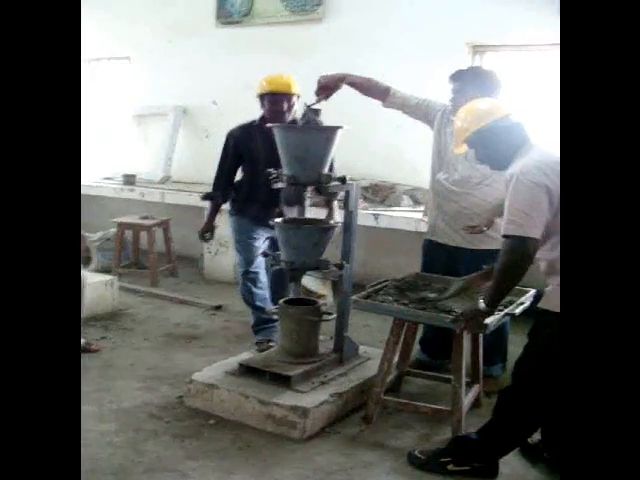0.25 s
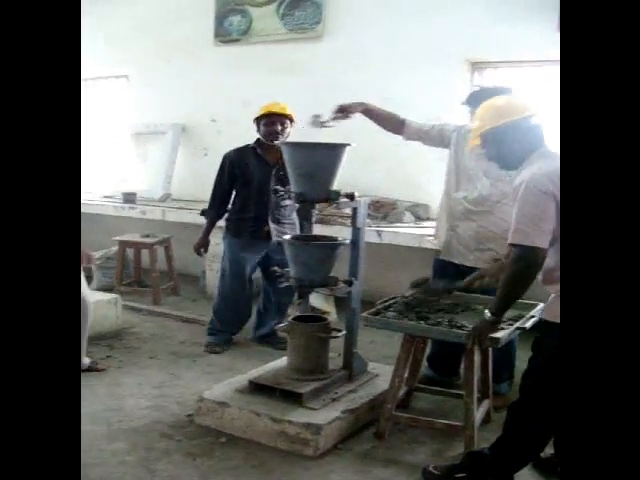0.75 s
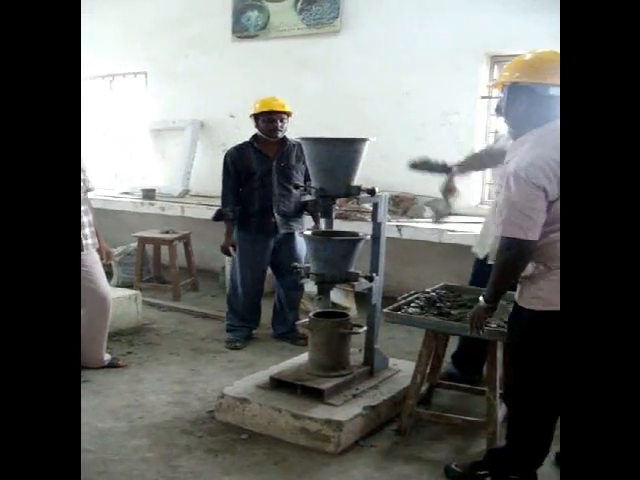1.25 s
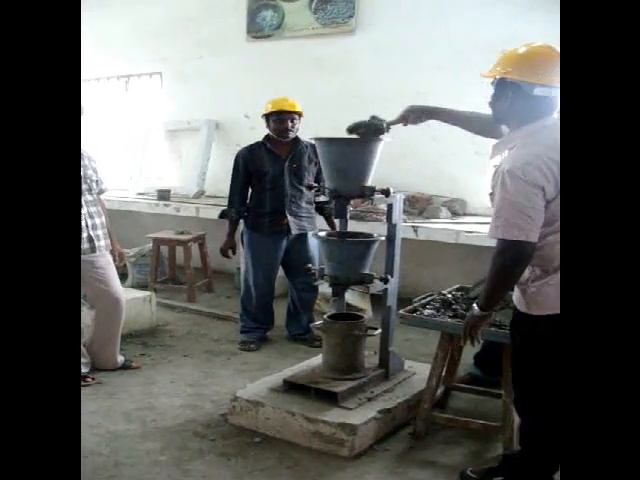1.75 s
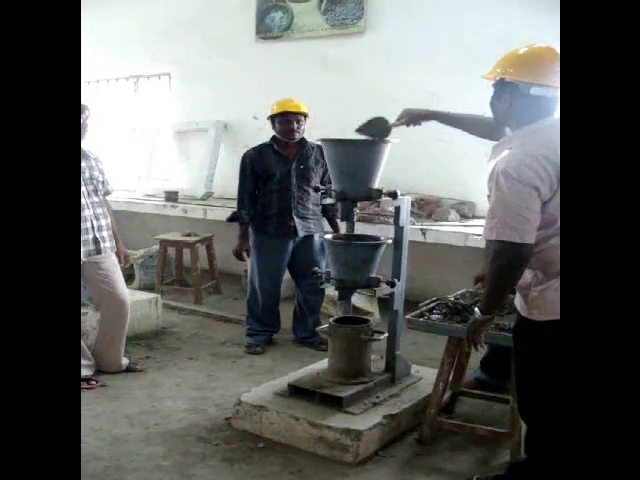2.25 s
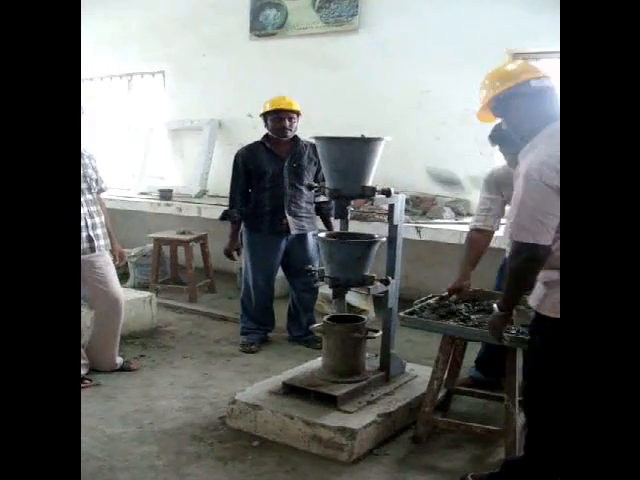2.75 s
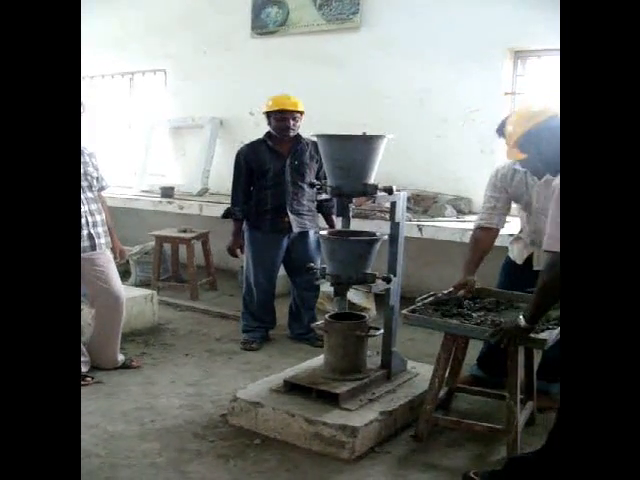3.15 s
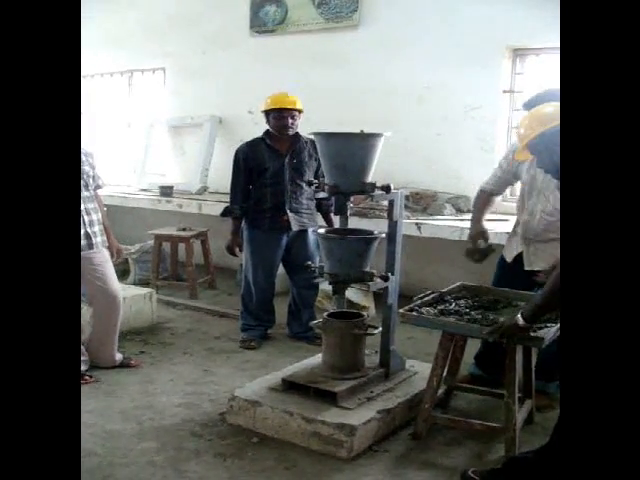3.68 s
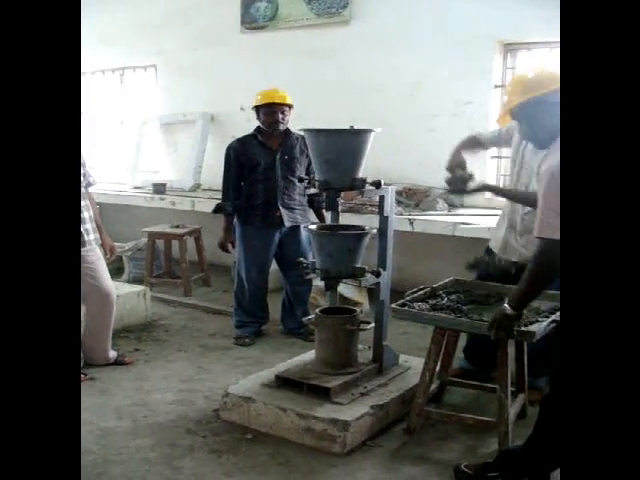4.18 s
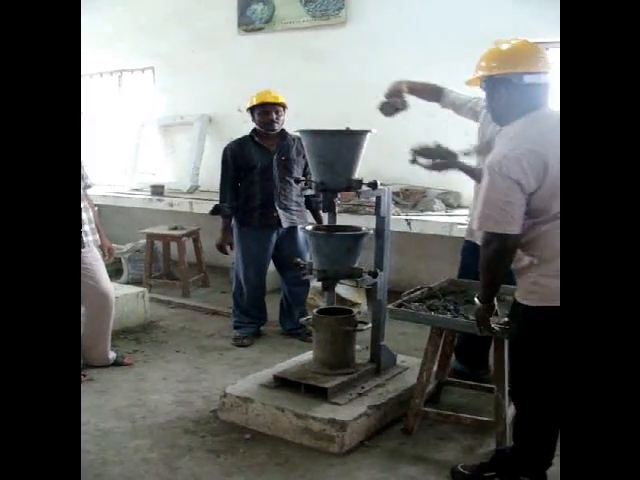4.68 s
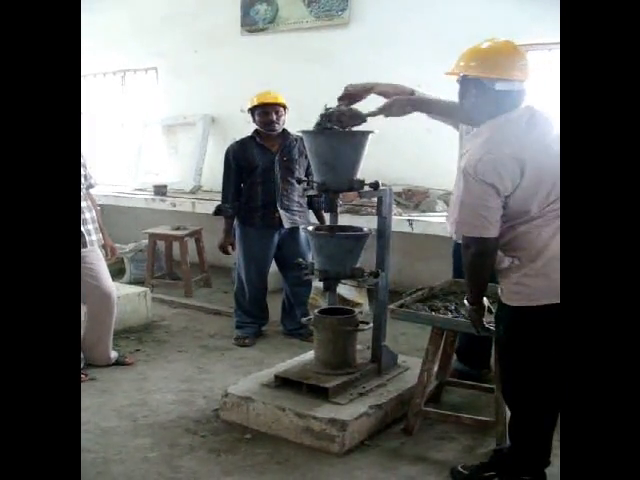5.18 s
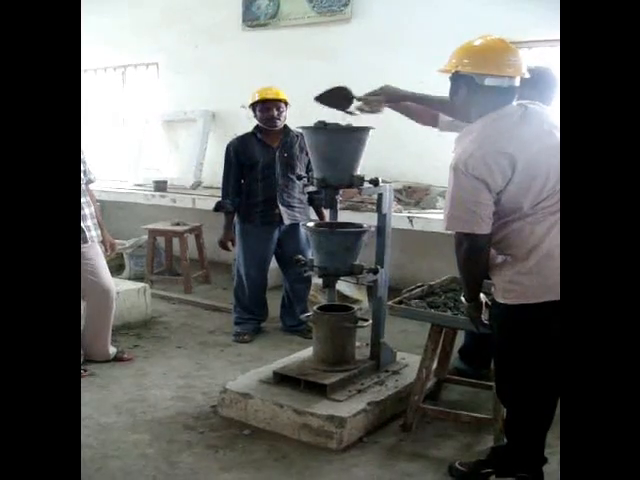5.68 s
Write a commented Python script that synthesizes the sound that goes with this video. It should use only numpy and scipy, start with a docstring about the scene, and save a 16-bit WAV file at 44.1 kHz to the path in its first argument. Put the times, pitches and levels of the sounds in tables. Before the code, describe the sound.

A steel scoop crunches and rasps through wet, gravelly concrete on a metal tray for the first half second. It pings thinly at about 0.5 seconds, then grit trickles, clods land and stones click until about 1.5. From 1.9 to 3.6 seconds the blade sticks and slips through the mix in short, gritty, slightly screeching pushes, with sharp stone clicks and a dull tray clatter at 3.2. After a brief lull, a whole load slaps down at 4.4 and loose gravel spatters. A trowel clinks brightly at 5 seconds, then knocks the sheet-metal hopper at 5.3, leaving it ringing while grit slides off, with a last small crunch at 5.8. Everything echoes in a bare lab over a soft rush of air, strongest at the start. The small mono microphone overloads with a low thump on the slap and the hopper knock.

```python
"""A bare, echoing lab, where fresh concrete is scooped from a steel tray into a sheet-metal hopper.
The blade sticks and slips through the gravel, crunching and rasping; stones click, wet clods land
and a whole load slaps down. Tray, scoop, trowel and hopper each crack and ring when struck.
Air rushes softly underneath, and a small mono microphone overloads slightly on the loudest moments."""
import sys
import numpy as np
from scipy import signal
from scipy.fft import rfft, irfft, next_fast_len
from scipy.io import wavfile
from scipy.ndimage import map_coordinates

SR = 44100
rng = np.random.default_rng(int(sys.argv[2]) if len(sys.argv) > 2 else 0)


def output_pcm(signal):
    """Save a mono or channel-first signal as 16-bit PCM at the path in sys.argv[1].

    Samples are clipped to [-1, 1] before scaling.
    """
    pcm = np.clip(np.atleast_2d(signal).T, -1, 1) * 32767
    wavfile.write(sys.argv[1], SR, np.round(pcm).astype(np.int16))


N = 261336


def amp(db):
    """Decibels to gain."""
    return 10 ** (np.asarray(db) / 20)


def unit(x):
    """x scaled to rms 1."""
    return x / np.sqrt(np.mean(x ** 2) + 1e-20)


def along(points, hz):
    """(Hz, value) points read on a log axis."""
    freqs, values = np.transpose(points)
    return np.interp(np.log(hz + 1), np.log(freqs), values)


def coloured(x, gain_db):
    """x through a minimum-phase EQ whose gain in dB is a function of frequency."""
    size = 2 * next_fast_len(len(x) // 2 + 4096)
    cepstrum = irfft(np.log(amp(gain_db(np.fft.rfftfreq(size, 1 / SR))) + 1e-6), size)
    cepstrum[1:size // 2] *= 2
    cepstrum[size // 2 + 1:] = 0
    return irfft(rfft(x, size) * np.exp(rfft(cepstrum)), size)[:len(x)]


def shaped(x, eq):
    """x through an EQ curve, at rms 1."""
    return unit(coloured(x, lambda hz: along(eq, hz)))


def wobble(rate):
    """A smooth random curve, rate knots a second."""
    return map_coordinates(rng.standard_normal(int(N * rate / SR) + 4), [np.arange(N) * rate / SR])


def add(track, start, sound):
    """Mix a sound into the track, start seconds in."""
    part = track[max(round(start * SR), 0):][:len(sound)]
    part += sound[:len(part)]


def grains(per_s, spread_db):
    """Random tiny impacts of very unequal size."""
    size = amp(spread_db * np.minimum(rng.exponential(size=N), 4))
    return unit((rng.random(N) < per_s / SR) * size * rng.standard_normal(N))


def stroke(start, length, attack_s, release_t60, sag_db_per_s=10):
    """Envelope of one movement: it rises, sags as it loses speed, then dies away."""
    t = np.maximum(np.arange(N) / SR - start, 0)
    release_db = 60 * np.maximum(t - length, 0) / release_t60
    return np.minimum(t / attack_s, 1) * amp(-sag_db_per_s * t - release_db)


# The hall's reverb. Each row: frequency in Hz, t60 in seconds.
HALL_DECAY = [(100, 0.37), (400, 2.43), (1000, 1.8), (2500, 1.46), (5000, 1.12), (9000, 0.93),
              (16000, 1.34)]
def hall_tail(early_share):
    """One echo of the plastered hall, energy 1: near surfaces answer first, the mids ring longest."""
    hz, t, noise = signal.stft(rng.standard_normal(SR), SR, nperseg=256)
    energy = amp(-120 * t / along(HALL_DECAY, hz)[:, None]) + early_share * np.exp(-t / 0.022)
    tail = signal.istft(noise * np.sqrt(energy), SR, nperseg=256)[1][:SR]
    return tail / np.linalg.norm(tail)


def room(x, wet_db, pieces=24):
    """x with its echo, which changes as the tools and people move."""
    out = x.copy()
    for start in np.arange(pieces) * (N // pieces):
        piece = x[start:start + N // pieces]
        if np.abs(piece).max() > 1e-4:
            add(out, start / SR, amp(wet_db) * signal.fftconvolve(piece, hall_tail(early_share=1.0)))
    return out


# Fader ride of the air. Each row: time in seconds, level in dB.
AIR_FADER = [(0, -33.5), (1.8, -39.5), (4, -43), (5.9, -44.5)]
# Tone of the air. Each row: frequency in Hz, relative level in dB.
AIR_EQ = [(18, -26), (30, -2), (59, -13.5), (228, -2), (288, -2.5), (374, -1.5), (511, -5.5), (953, -5.5),
          (1110, -7.5), (1690, -5.5), (15000, -34)]
def room_tone():
    """The soft, wavering rush of air in the hall."""
    level_db = np.interp(np.arange(N) / SR, *np.transpose(AIR_FADER))
    return amp(level_db + wobble(3.86)) * shaped(rng.standard_normal(N), AIR_EQ)


# Microphone overload thumps. Each row: start in seconds, level in dB.
OVERLOADS = [(4.398, -23), (5.34, -21.5)]
# Their low end. Each row: frequency in Hz, relative level in dB.
OVERLOAD_EQ = [(15, 7), (30, 1), (60, -12), (170, -14), (400, -38)]
def overload_thumps():
    """A short, low thump of the microphone overloading on the two loudest blows."""
    track, t = np.zeros(N), np.arange(SR // 4) / SR
    envelope = amp(-60 * t / 0.19) * (1 - np.exp(-t / 0.0023))
    for start, db in OVERLOADS:
        add(track, start, amp(db) * shaped(rng.standard_normal(len(t)), OVERLOAD_EQ) * envelope)
    return track


# Base tone of all grit and impacts. Each row: frequency in Hz, relative level in dB.
GRIT_EQ = [(60, -13), (200, -27), (500, -4), (700, 2.5), (1500, -0.5), (3300, 2), (6000, 0.5), (9000, -5.5),
           (16000, -15.5)]
def impact(centre_hz, tilt_db, t60, wet_db):
    """A gritty contact and its echo, rolled off by tilt_db per octave either side of centre_hz."""
    def colour(hz):
        return along(GRIT_EQ, hz) - tilt_db * np.abs(np.log2((hz + 1) / centre_hz))

    t = np.arange(SR) / SR
    envelope = amp(-60 * t / t60) * (1 - np.exp(-t / 0.00081))
    contact = envelope * rng.standard_normal(SR)
    build_up = np.sqrt(np.cumsum(envelope ** 2))
    echo = amp(wet_db) * build_up * hall_tail(early_share=5.6)
    mean_gain = np.sqrt(np.mean(amp(colour(np.fft.rfftfreq(2048, 1 / SR))) ** 2))
    return coloured(contact + echo, colour) / mean_gain


# Wet mix sliding. Each row: start in seconds, length in seconds, relative level in dB.
MIX_SLIDES = [(.55, 0.086, -26), (0.802, 0.14, -27.5), (1.767, 0.24, -29.5), (5.158, 0.19, -25),
              (5.465, .06, -18.5), (5.63, 0.17, -28.5)]
def sliding():
    """Loose grit trickles off the trowel: it starts to run, thins out and stops."""
    flow = sum(amp(db) * stroke(start, length, attack_s=0.027, release_t60=0.18)
               for start, length, db in MIX_SLIDES)
    return flow * amp(-7.5) * shaped(grains(per_s=2700, spread_db=1.5), GRIT_EQ)


# Stone clicks. Each row: start in seconds, level in dB, tone centre in Hz, roll-off in dB per octave.
STONE_HITS = [(0.07, -12, 4930, 12), (.298, -6, 4500, 3.5), (.711, -15, 7110, 1.5), (1.251, -24, 3900, 9),
              (1.355, -6.5, 3980, 1), (1.473, -17, 2130, 11), (1.769, -15, 4100, 5), (1.961, -8, 2650, 32),
              (2.041, -8, 2650, 15), (2.367, -4, 1300, 2.5), (2.443, -6, 1400, 1), (2.5, -6.5, 3300, 13),
              (2.864, -6.5, 3000, 4.5), (4.083, -23, 4580, 3), (5.253, -7.5, 5700, 5.5)]
def stones():
    """Single stones click on the tray and in the hopper, each at its own pitch."""
    track = np.zeros(N)
    for start, db, centre_hz, tilt_db in STONE_HITS:
        add(track, start, amp(db) * impact(centre_hz, tilt_db, t60=0.032, wet_db=-0.5))
    return track


# Crunches of clods and blade bites. Each row: start in seconds, level in dB, tone centre in Hz.
CRUNCH_HITS = [(.779, -16.5, 1300), (.86, -12.5, 2730), (0.916, -19, 4470), (1.284, -27.5, 5140),
               (1.385, -16.5, 1300), (2.265, -13, 1420), (2.731, -13, 3000), (2.978, -8.5, 1180),
               (3.264, -5, 4480), (4.283, -22, 2470), (5.092, -21, 6500), (5.144, -17, 4500),
               (5.785, -18, 1940)]
def crunches():
    """Broad, gritty crunches: wet clods landing and the blade biting into the mix."""
    track = np.zeros(N)
    for start, db, centre_hz in CRUNCH_HITS:
        add(track, start, amp(db) * impact(centre_hz, tilt_db=3.5, t60=0.057, wet_db=1.0))
    return track


def slap(start=4.4):
    """A whole load lands at once; its loose gravel spatters just after and settles."""
    track = np.zeros(N)
    load = impact(centre_hz=3530, tilt_db=1.0, t60=0.11, wet_db=-0.6)
    spatter = impact(centre_hz=2620, tilt_db=0.5, t60=0.78, wet_db=0.4)
    add(track, start, amp(-7) * load)
    add(track, start + 0.025, amp(-16) * spatter)
    return track


def struck(hits, modes, ring_db, blur, crack_db, **crack_tone):
    """Struck steel: a crack, then modes whose phase wanders (blur) under the loose, wet load."""
    cracks, rings, t = np.zeros(N), np.zeros(N), np.arange(SR) / SR
    hz, mode_db, t60 = np.transpose(modes)[:, :, None]
    attack = 1 - np.exp(-t / 0.00023)
    for start, db in hits:
        drift = blur * np.sqrt(hz / SR) * np.cumsum(rng.standard_normal((len(hz), SR)), axis=1)
        phase = 2 * np.pi * (hz * t + rng.random(hz.shape)) + drift
        partials = amp(mode_db - 60 * t / t60) * np.sin(phase)
        add(rings, start, amp(db + ring_db) * partials.sum(axis=0) * attack)
        add(cracks, start, amp(db + crack_db) * impact(**crack_tone, wet_db=2.5))
    return cracks + room(rings, wet_db=-1.0)


# Hits on the scoop. Each row: start in seconds, relative level in dB.
SCOOP_HITS = [(.522, -15), (.624, -24)]
# Its ring. Each row: pitch in Hz, relative level in dB, t60 in seconds.
SCOOP_MODES = [(2850, -1, .31), (3616, 2, 0.46), (4700, 3, 0.22), (5780, -15.5, .4), (6961, -15, .4),
               (8160, -5, 0.29), (9800, -11, .27)]
def scoop_pings():
    """Stones ring the scoop as it empties: a sharp tick and a thin, high ping."""
    return struck(SCOOP_HITS, SCOOP_MODES, ring_db=-13, blur=0.071,
                  crack_db=14.5, centre_hz=4200, tilt_db=10.5, t60=0.011)


# The hit on the trowel. Each row: start in seconds, relative level in dB.
TROWEL_HITS = [(4.964, -15.5)]
# Its ring. Each row: pitch in Hz, relative level in dB, t60 in seconds.
TROWEL_MODES = [(505, -24.5, 0.74), (1480, -23.5, 0.36), (2880, -11, .1), (3020, -5, 0.12),
                (3400, -25, 0.069), (3420, 3, 0.08), (3900, -4, .07), (3650, -13, 0.058),
                (4600, -19, 0.073), (7300, 0.5, 0.046)]
def trowel_clink():
    """The steel trowel clinks, bright and tight."""
    return struck(TROWEL_HITS, TROWEL_MODES, ring_db=1.5, blur=0.59,
                  crack_db=6.5, centre_hz=4300, tilt_db=13, t60=0.017)


# The hit on the hopper. Each row: start in seconds, relative level in dB.
HOPPER_HITS = [(5.339, -8.5)]
# Its ring. Each row: pitch in Hz, relative level in dB, t60 in seconds.
HOPPER_MODES = [(280.8, -13.5, 1.3), (622, -23.5, 1.75), (850, -15, 0.59), (1435, 3, 0.095),
                (1543, -3.5, 0.18), (1585, -6, 0.58), (1760, -11.5, 0.44), (1980, -1.5, 0.13),
                (2096, 7, 0.08), (2180, -4, 0.45), (2670, 6.5, 0.13), (2840, -17, 0.22), (3380, -2.5, 0.31),
                (4160, -11, 0.98), (4530, -17, 0.44), (4650, -4, 0.48), (4980, -10, 0.76), (5590, -6, 0.53),
                (5660, -12, 0.45), (5700, -6, 0.56), (6000, -6, .3), (7040, 1, 0.12)]
def hopper_knock():
    """The trowel knocks on the rim and the sheet metal rings on."""
    return struck(HOPPER_HITS, HOPPER_MODES, ring_db=-6.0, blur=0.16,
                  crack_db=-3.0, centre_hz=5200, tilt_db=4.5, t60=0.49)


# Hits on the tray. Each row: start in seconds, relative level in dB.
TRAY_HITS = [(3.175, -8.5), (3.189, -6.5), (3.213, -12)]
# Its ring. Each row: pitch in Hz, relative level in dB, t60 in seconds.
TRAY_MODES = [(178, -11, 0.14), (305.5, -3.5, 0.3), (360.3, -3, 0.35), (398.3, 1.5, 0.17), (647, 4, 0.041),
              (763, 3, 0.054), (1026, -5, 0.23), (1290, -18, .12), (1363, 1, 0.69), (1690, 0, 0.3),
              (1870, -13, 0.11), (3200, 4, .07)]
def tray_clunks():
    """The blade meets the loaded tray in a quick, dull clatter."""
    return struck(TRAY_HITS, TRAY_MODES, ring_db=-13.0, blur=0.32,
                  crack_db=-1, centre_hz=700, tilt_db=3.0, t60=0.062)


# Tones of gravel, blade, edge and tray. Each row: frequency in Hz, relative level in dB.
GRAVEL_EQ = [(100, -30), (500, -13), (650, -6.5), (1000, -8), (1700, 0), (2500, -1), (3500, 2),
             (6000, -1.5), (9000, -9), (16000, -23.5)]
RASP_EQ = [(200, -38), (500, -20.5), (650, -12), (850, 1.5), (1120, 4), (1400, 4), (1900, -9),
           (2450, -11.5), (3500, -7.5), (9000, -61)]
SCREECH_EQ = [(900, -36), (1700, -7), (2150, -2), (2480, -0.5), (2900, -5), (3300, -6), (5000, -23.5)]
BOOM_EQ = [(40, -20), (120, -29.5), (180, -5), (225, -12), (300, -7), (375, 0), (430, 0.5), (500, -11),
           (620, 3), (760, -1.5), (1200, -25)]
# Pushes through the tray. Each row: start in seconds, length in seconds, then relative levels
# in dB of crunch, rasp, screech and boom.
SCOOP_PUSHES = [(0.0, 0.079, -22, -19.5, -23, -21.5), (0.089, 0.21, -15, -21, -14.5, -24.5),
                (0.332, 0.073, -28.5, -18.5, -20, -28.5), (1.901, .05, -29.5, -23.5, -20, -31.5),
                (1.947, 0.06, -25.5, -26.5, -21, -36), (2.024, 0.26, -19.5, -16.5, -10, -24.5),
                (2.352, 0.12, -20, -14, -19.5, -24.5), (2.586, .12, -24, -16, -19.5, -18.5),
                (2.721, 0.11, -25, -25, -18.5, -25), (2.854, 0.11, -27.5, -16.5, -22, -23.5),
                (3.253, 0.16, -14.5, -21.5, -21, -30.5), (3.437, 0.11, -25.5, -25, -14.5, -29),
                (4.269, 0.036, -41.5, -32.5, -57, -30.5)]
def scooping():
    """The blade sticks and slips in the mix: grit cracks, steel rasps and screeches, the tray booms."""
    crunch, rasp, screech, boom = sum(
        amp(levels_db)[:, None] * stroke(start, length, attack_s=0.026, release_t60=0.38)
        for start, length, *levels_db in SCOOP_PUSHES)
    stick_slip = unit(amp(1.54 * wobble(50) + 2.0 * wobble(220)))
    gravel = amp(2.5) * crunch * shaped(grains(per_s=4000, spread_db=3.0), GRAVEL_EQ)
    blade = amp(-1.5) * rasp * shaped(grains(per_s=1500, spread_db=2.5), RASP_EQ)
    edge = amp(-5) * screech * shaped(grains(per_s=1000, spread_db=4), SCREECH_EQ)
    tray = amp(-5.5) * boom * shaped(grains(per_s=1500, spread_db=2.5), BOOM_EQ)
    stone_snaps = amp(-12.5) * crunch * shaped(grains(per_s=45, spread_db=-2.0), GRIT_EQ)
    return stick_slip * (gravel + blade + edge + tray) + stone_snaps


def scene():
    """All the work sounds over the room tone, the same in both channels."""
    steel = tray_clunks() + trowel_clink() + hopper_knock() + scoop_pings()
    scrapes = room(scooping() + sliding(), wet_db=0.1)
    impacts = stones() + crunches() + slap()
    return np.tile(steel + scrapes + impacts + overload_thumps() + room_tone(), (2, 1))


# The microphone's response and its square-law leak. Each row: frequency in Hz, gain in dB.
MIC_EQ = [(30, -1.5), (5000, -1.5), (9900, -1), (10150, -7.5), (12500, -5.5), (15500, 2.5)]
THUMP_EQ = [(4, -23), (20, -20.5), (70, -20), (400, -32)]
def record(dry):
    """A slightly lopsided microphone adds a faint thump to loud crunches and rounds off the peaks."""
    ceiling, high_cut_hz = 0.97, 15900
    clean = coloured(dry[0], lambda hz: along(MIC_EQ, hz))
    thump = coloured(dry[0] ** 2, lambda hz: along(THUMP_EQ, hz))
    lopsided = clean - thump
    rounded = lopsided / (1 + np.abs(lopsided / ceiling) ** 8) ** (1 / 8)
    size = next_fast_len(N + SR // 4)
    passband = np.fft.rfftfreq(size, 1 / SR) < high_cut_hz
    mono = irfft(rfft(rounded, size) * passband, size)[:N]
    return np.tile(mono, (2, 1))


dry = scene()
out = record(dry)
output_pcm(out)
```